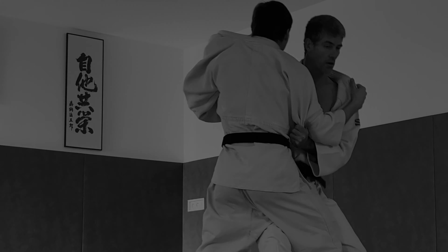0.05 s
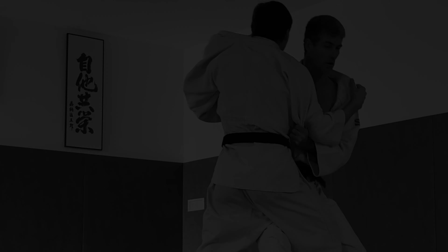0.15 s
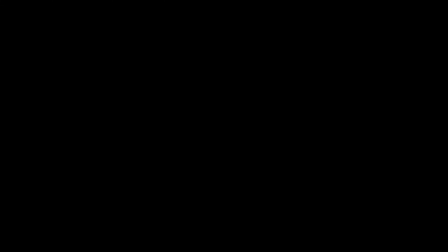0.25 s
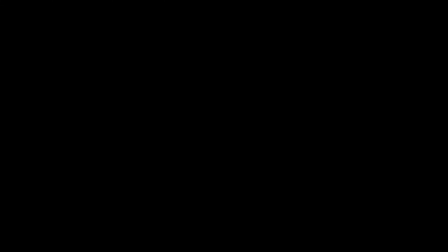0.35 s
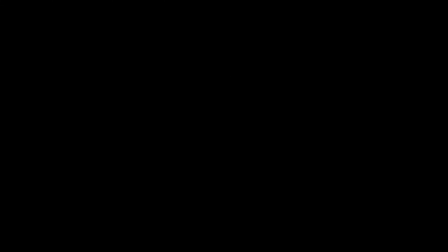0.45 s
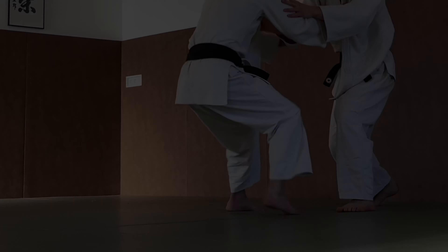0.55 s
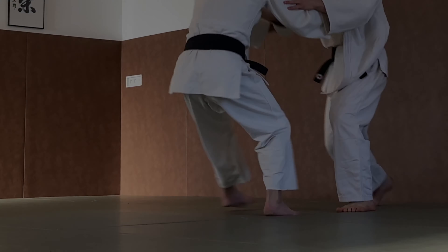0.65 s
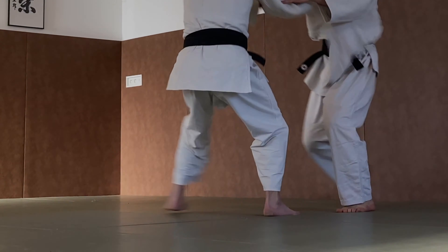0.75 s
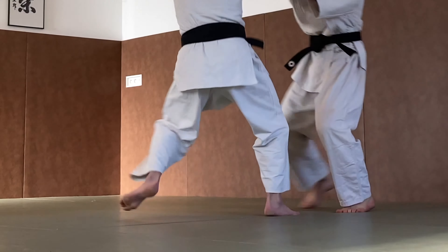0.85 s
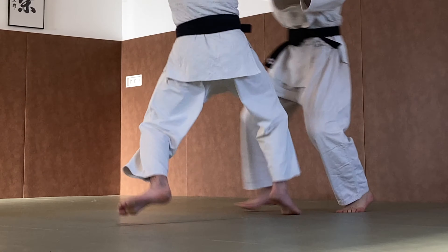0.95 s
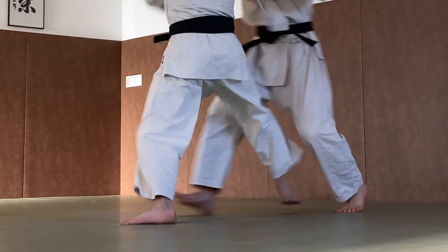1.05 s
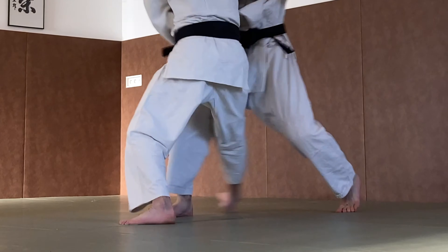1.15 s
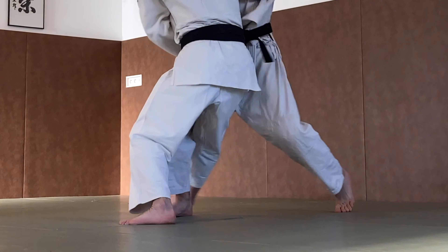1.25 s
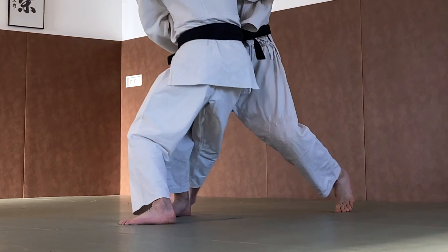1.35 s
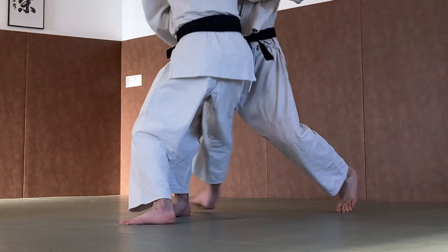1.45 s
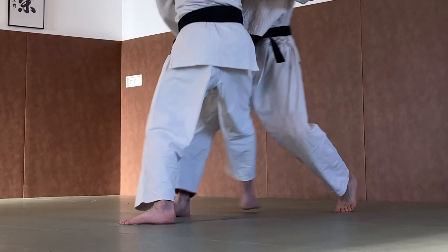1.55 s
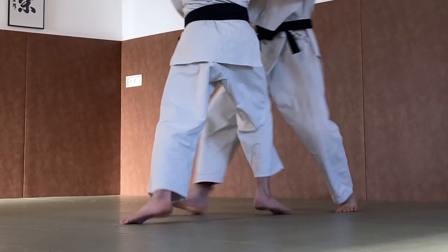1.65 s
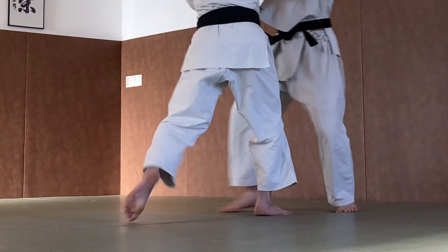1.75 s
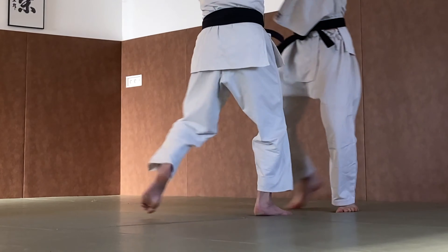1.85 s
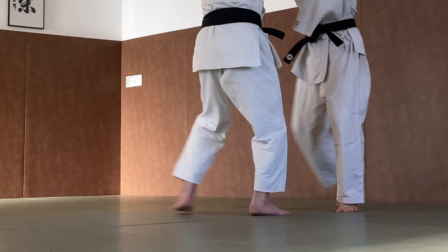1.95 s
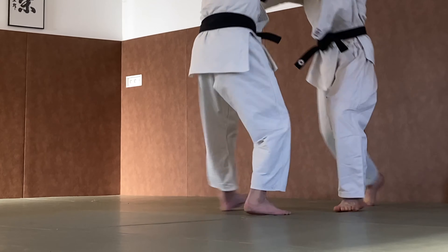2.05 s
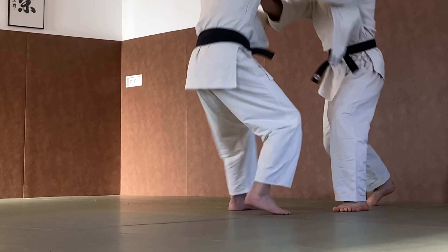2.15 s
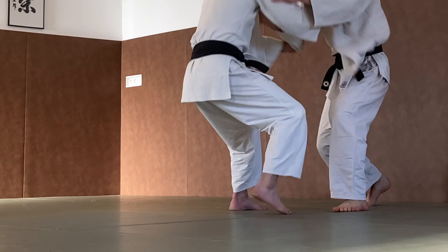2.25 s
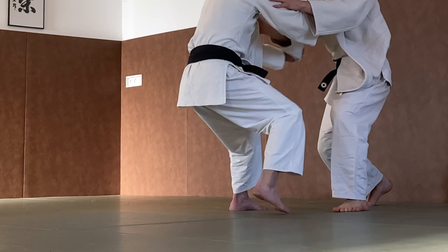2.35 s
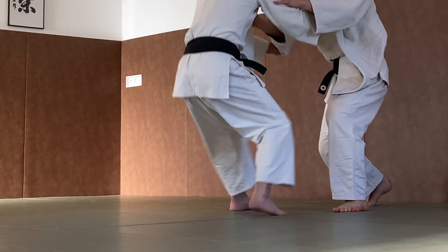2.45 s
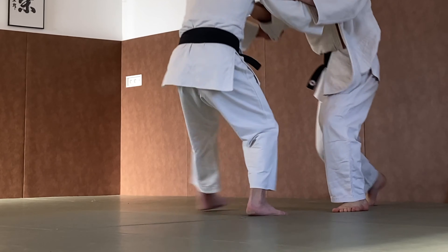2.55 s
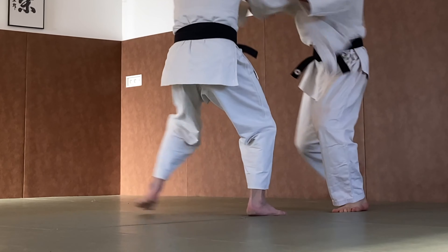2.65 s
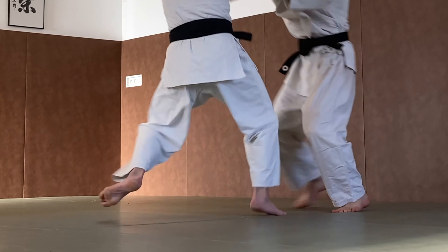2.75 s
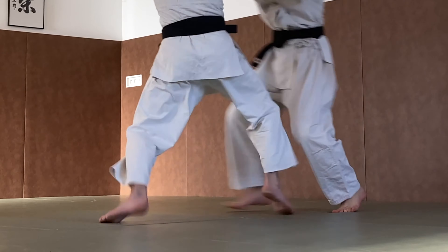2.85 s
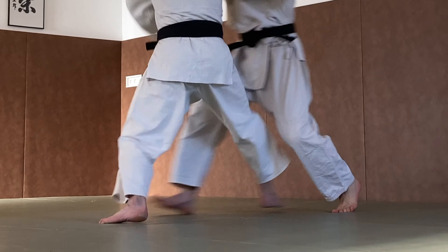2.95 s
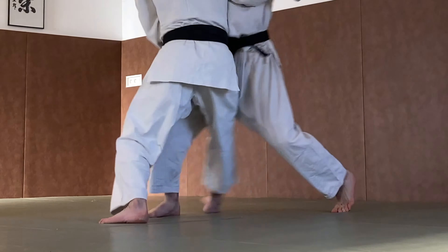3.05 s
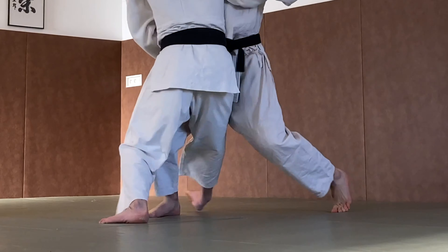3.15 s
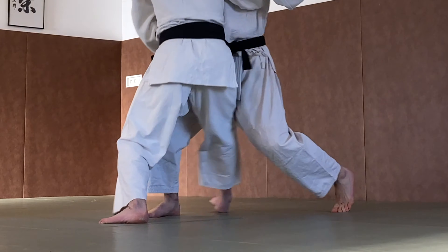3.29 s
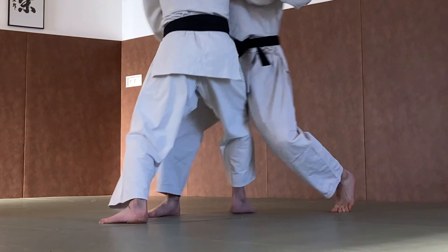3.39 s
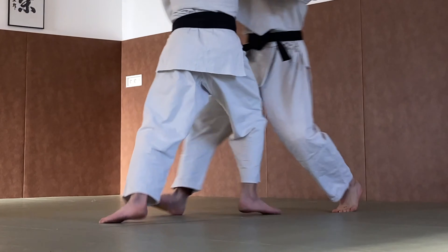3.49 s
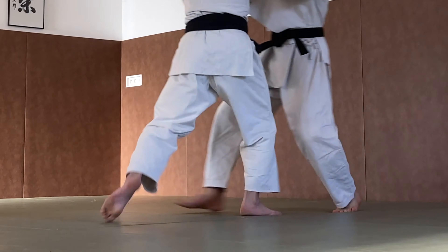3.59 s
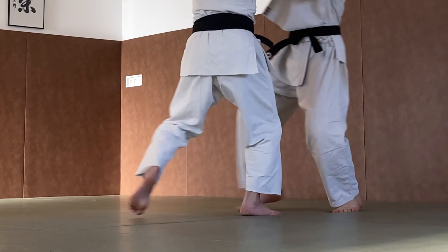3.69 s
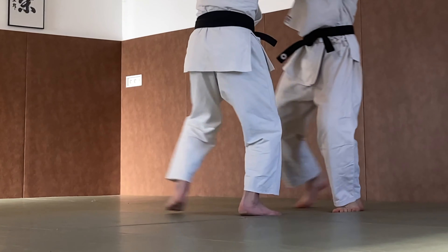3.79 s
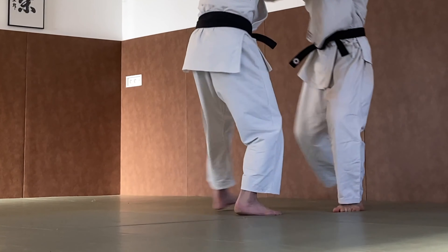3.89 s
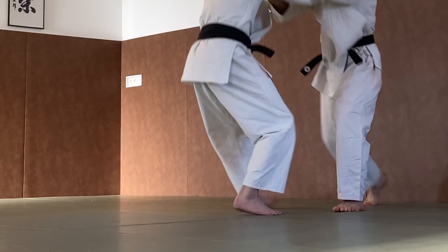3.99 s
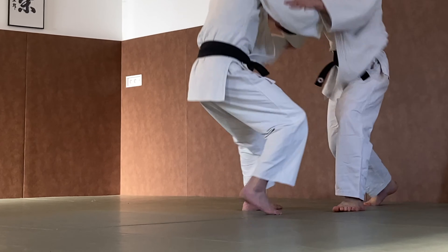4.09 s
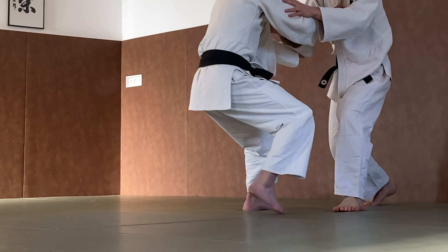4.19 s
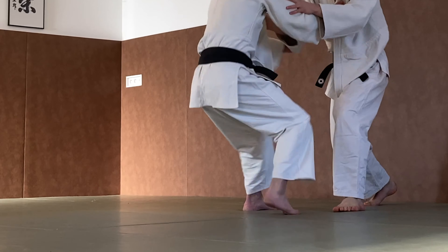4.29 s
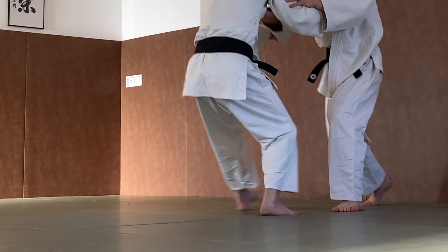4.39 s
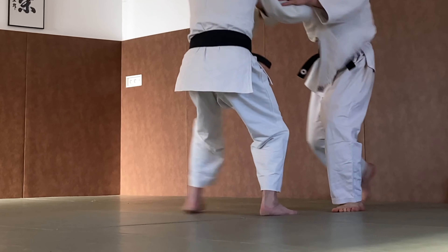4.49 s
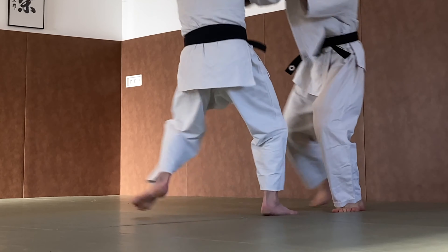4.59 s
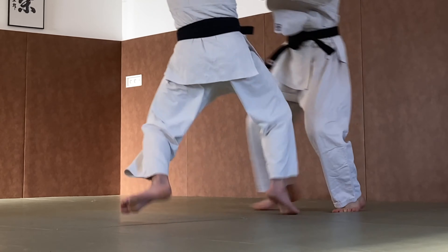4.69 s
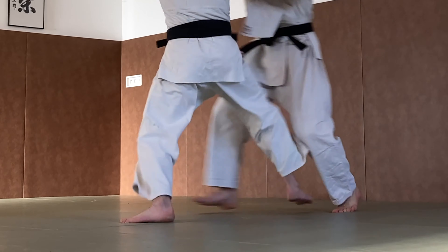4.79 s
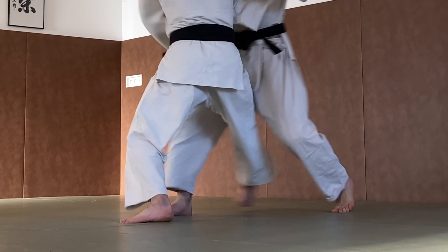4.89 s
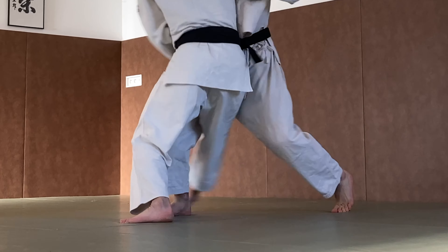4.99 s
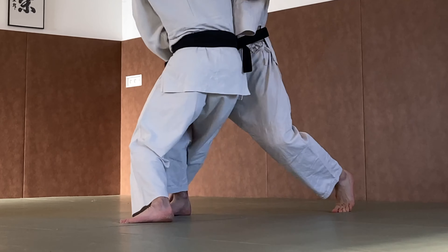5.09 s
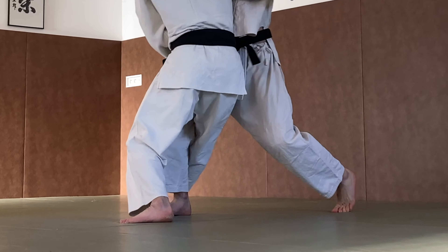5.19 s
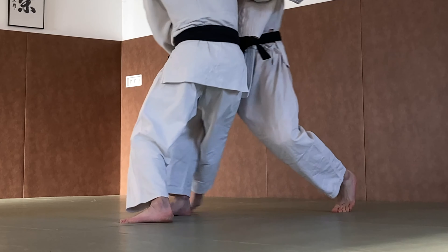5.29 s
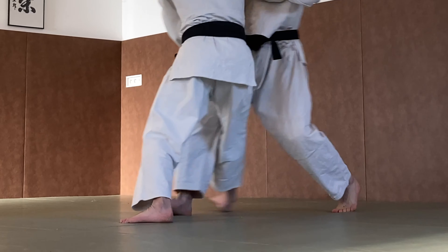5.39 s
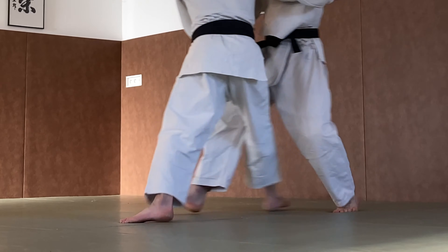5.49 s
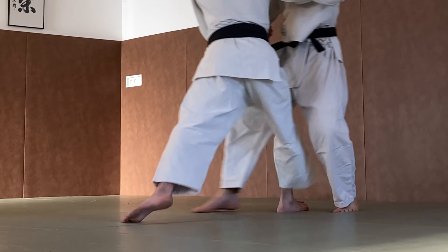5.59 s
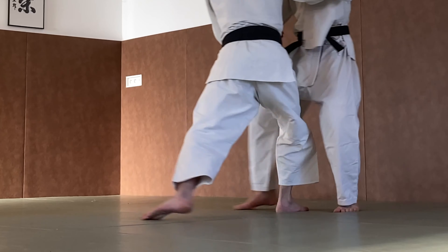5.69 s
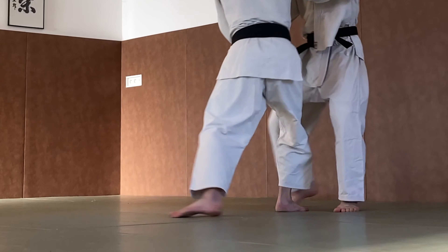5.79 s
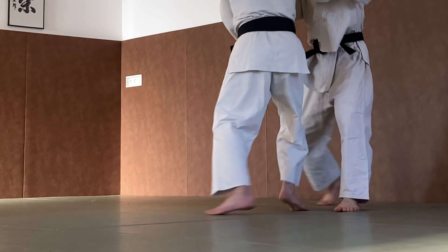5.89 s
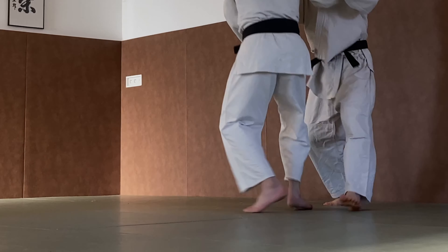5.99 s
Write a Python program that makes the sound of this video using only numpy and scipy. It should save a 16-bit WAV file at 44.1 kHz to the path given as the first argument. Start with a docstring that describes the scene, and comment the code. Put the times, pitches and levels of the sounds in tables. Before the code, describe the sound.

After a short fade-in, bare feet pad and slide across a mat until a flat sole lands with a sharp crack and a low boom. The pattern comes three times: light steps, dull heel knocks, a hard stamp, more shuffling. Thick cotton jackets rub and snap as two people pull at each other. The microphone picks up the ring of a small training hall and its quiet, low room tone.

```python
"""Judo drill in a live hall

Two judoka drill a throw entry barefoot on a padded floor. Three hard stamps crack and slap
the mat and set the floor and the small hall's low modes booming. Between them come soft steps,
hollow heel knocks, soles hissing over the mat and heavy cotton jackets that rustle and snap,
all over the building's low murmur."""
import sys
import numpy as np
from scipy import signal
from scipy.fft import rfft, irfft
from scipy.io import wavfile
from scipy.ndimage import uniform_filter1d

SR = 44100
rng = np.random.default_rng(int(sys.argv[2]) if len(sys.argv) > 2 else 0)


def to_wav(sig):
    """Store sig (one row per channel, or 1-D mono) as 16-bit WAV at the path in sys.argv[1].

    Samples outside -1..1 are clipped; the rate is SR.
    """
    pcm = np.clip(np.atleast_2d(sig), -1, 1) * 32767
    pcm = np.round(pcm).astype(np.int16)
    wavfile.write(sys.argv[1], SR, pcm.T)  # frames by channels


N = 266220
TIME = np.arange(N) / SR

# Cue sheets; levels are relative, ahead of each layer's gain and EQ.
# Jacket tugs: t/s at full pull, level/dB
TUGS = [(.34, -76), (.94, -54.5), (1.78, -55), (2.17, -51.5), (2.93, -46.5), (3.42, -47), (3.66, -52),
        (4.522, -54), (4.84, -46.5), (5.33, -49.5), (5.709, -49.5), (6.0, -52)]
# Strokes of a sole or hem over the mat: t/s, rise/s, time until the fade/s, level/dB
SLIDES = [(0.185, 0.074, 0.055, -55), (0.572, 0.052, 0.27, -69.5), (0.827, 0.07, 0.13, -56),
          (1.049, 0.076, 0.27, -51.5), (1.634, 0.097, 0.19, -51.5), (1.84, 0.041, 0.16, -57),
          (2.033, 0.043, 0.088, -51.5), (2.47, 0.086, 0.34, -70), (2.72, 0.11, 0.42, -58),
          (3.186, 0.33, 0.28, -50), (3.654, 0.028, 0.22, -54), (4, 0.018, 0.044, -59),
          (4.3, .02, 0.03, -62), (4.401, .085, 0.1, -52), (4.624, 0.08, 0.14, -54),
          (5.114, 0.27, 0.32, -47), (5.412, 0.058, 0.16, -57), (5.609, 0.049, 0.48, -50)]
# Snaps of cloth and ticks of skin leaving the mat: t/s, level/dB, tilt/(dB per octave)
SNAPS = [(1.0175, -15, -0.5), (1.055, -16.5, 0), (1.6888, -26, -4), (2.875, -22, -1), (2.9245, -20.5, 0.5),
         (4.7552, -23, -7), (4.7978, -16, 9), (5.6246, -23, -2)]
# Soft steps: t/s, thump/dB, thump cutoff/Hz, skin pat/dB
STEPS = [(.236, -46, 200, -22.5), (0.452, -70, 244, -48), (.609, -39.5, 225, -48), (.798, -28, 208, -21),
         (1.018, -30, 244, -18.5), (1.716, -29.5, 217, -19), (1.932, -45, 171, -29.5),
         (2.104, -39.5, 169, -20), (2.265, -37.5, 177, -22.5), (2.32, -37.5, 115, -45),
         (2.672, -32.5, 212, -19.5), (2.876, -27, 325, -25.5), (2.94, -32, 200, -30),
         (3.531, -40, 298.5, -24.5), (3.62, -50, 300, -31), (3.819, -53, 400, -41), (3.921, -72, 400, -36),
         (4.027, -40.5, 260, -18), (4.401, -38, 295, -27), (4.548, -36.5, 200, -26.5),
         (4.756, -28.5, 248, -22), (4.866, -31, 200, -21.5), (5.575, -36, 228, -24.5),
         (5.622, -30, 177, -30), (5.968, -33.5, 265, -28)]
# Heel landings: t/s, press-in/s, knock/dB, skin smack/dB, floor push/dB
HEELS = [(.792, 0.0081, -4.5, -10, -48), (1.718, 0.041, -8, -8, -54), (2.252, 0.015, -3.5, -9, -54),
         (2.665, 0.0069, 0, -5, -52), (3.551, .008, -18, -21, -63), (4.021, 0.0098, -10.5, -7.5, -67),
         (4.549, 0.0025, -10.5, -14.5, -50), (5.619, 0.0072, -14, -9.5, -49)]
# Stamps: t/s, boom/dB, slap/dB, crack/dB, air clap/dB, clap f/Hz, boom lift at 300 Hz/dB, knock/dB
STAMPS = [(1.136, -6.5, -3.5, -4, 0, 2010, -9, 4), (3.0207, -9.5, -6, -7.5, -6, 1650, 2, -3),
          (4.9022, -10.5, -7.5, -15, -16.5, 2900, -0.5, 5.5)]

# Reverb time of the hall: f/Hz, t60/s
HALL_DECAY = [(60, 0.88), (250, 0.88), (480, 0.47), (720, 0.59), (1100, 0.79), (2200, 0.83), (4500, 1),
              (8000, 0.63), (12000, 0.56), (16000, 0.39)]
# Likeness of left and right in the hall: f/Hz, correlation (-1 to 1)
STEREO_LIKENESS = [(60, 0.83), (150, 0.99), (290, 0.64), (640, 0.056), (1400, 0.078), (16000, 0.022)]
# Low modes of floor and room, rising: f/Hz, level/dB, t60/s
LOW_MODES = [(71.7, -16.5, .75), (75, -14, .68), (78.3, -5.7, .41), (89, -1.8, .76), (103.7, -7.5, .41),
             (107.4, -18.2, .99), (124, -8.7, .4), (135.4, 1.2, .51), (135.7, 3.9, .39), (158.4, -23, 1.4),
             (169.4, 8.6, .37), (169.7, 11.4, .29), (202.2, -21.3, .42), (206.4, -14.9, .64),
             (214.4, -7.5, .33), (228.4, -15, .5), (250.8, -10.9, .44), (256.1, -19.9, .55),
             (285.5, -12.1, .25), (290.7, -17, .52), (320, -30, .46), (329.6, -14, .11),
             (337.2, -21.5, .32), (351.8, -25, .53)]
# Upper resonances of mat and room: f/Hz, width/Hz, level/dB
UPPER_RINGS = [(452, 21, 10), (673, 61, 5), (1440, 120, -1), (2000, 43, -7), (2218, 100, 5),
               (2450, 32, 1.5), (3070, 70, 0), (3610, 38, 5)]
# A stamp's thump thrown back by the walls: delay/s, level/dB, f/Hz
REBOUNDS = [(.0519, -11, 302), (.0821, -1, 142), (.134, -18, 274), (.2609, -13.5, 100)]
# The air pop, direct and off the nearest walls: delay/s, level/dB, left channel lag/s
POP_PATHS = [(0, 0, 0), (.0031, -6, .0002), (.0068, -3, -.0001), (.0105, -8, -.0003), (.015, -5, .0003)]

# EQ curves, one per sound: f/Hz, level/dB
MURMUR_EQ = [(20, -41), (40, -10), (80, 0), (160, -9.5), (300, -11.5), (600, -24.5), (2000, -31),
             (8000, -51), (16000, -53)]  # the building's rumble
RUSTLE_EQ = [(30, -16), (150, 10), (300, 6), (550, -3.5), (900, 2), (1400, 1), (2500, 0), (4500, -6.5),
             (8000, -6), (16000, -84)]  # thick cotton rubbing
SLIDE_EQ = [(100, -29), (1500, -10.5), (3500, -0.5), (5500, -3.5), (7800, -2.5), (11000, 3.5),
            (15000, -6.5), (16500, -2)]  # a sole brushing the mat
SNAP_EQ = [(100, -39), (1000, -1.5), (4000, -3), (8000, -6.5), (12000, -1), (16000, -11)]  # cloth pulling taut
PAT_EQ = [(30, -2), (150, 21), (400, 12.5), (750, 8.5), (1300, 6), (2500, -2), (5000, -6.5), (10000, -20),
          (16000, -16)]  # skin landing lightly
KNOCK_EQ = [(30, -17), (100, -14), (270, 6.5), (460, 9), (680, 3), (950, -1), (1400, -15), (4200, -40),
            (16000, -49)]  # the hollow body of a heel strike
SMACK_EQ = [(100, -23), (500, -12), (900, 6), (1800, 2), (4300, -2), (5500, -13), (8000, -7), (16000, -35)]  # the skin of the heel
SLAP_EQ = [(25, -40), (39, 9), (48, 5), (62, 0), (150, 5.5), (330, 7.5), (480, -2), (620, -2), (1000, -3),
           (2200, -5.5), (3500, -6), (5500, -8.5), (7800, -6.5), (12000, -11.5), (16000, -26)]  # a flat sole landing hard
CRACK_EQ = [(100, -4), (700, -6), (1700, -1), (3200, -1), (5000, -11), (8000, -20), (11000, 3.5),
            (16000, -17)]  # a stamp's first touch


def amp(db):
    """Decibels to gain."""
    return 10 ** (np.asarray(db) / 20)


def unit(x):
    """Scales to rms 1."""
    return x / np.sqrt(np.mean(x ** 2) + 1e-20)


def curve_at(points, hz):
    """Reads a curve on a log-frequency axis."""
    f, value = np.transpose(points)
    return np.interp(np.log(hz + 1), np.log(f + 1), value)


def add(mix, s, sound):
    """Mixes a stereo sound in at time s."""
    part = mix[:, max(round(s * SR), 0):][:, :sound.shape[1]]
    part += sound[:, :part.shape[1]]


def eq(x, points, size=4096):
    """Minimum-phase EQ, so nothing rings ahead of an attack."""
    log_gain = np.log(amp(curve_at(points, abs(np.fft.fftfreq(size, 1 / SR)))))
    spectrum = np.exp(np.conj(signal.hilbert(log_gain)))
    taps = np.fft.ifft(spectrum).real[:size // 2]
    return signal.oaconvolve(x, taps[None], axes=1)[:, :x.shape[1]]


def stereo_field(x):
    """Blends two unrelated channels: narrow in the bass, wide in the treble."""
    likeness = curve_at(STEREO_LIKENESS, np.fft.rfftfreq(x.shape[1], 1 / SR))
    angle = np.arccos(np.clip(likeness, -1, 1)) / 2
    mid, side = rfft(x)
    return irfft(mid * np.cos(angle) + np.array([[1], [-1]]) * side * np.sin(angle), x.shape[1])


def murmur(db=-55):
    """Room tone: the steady low murmur of the building."""
    noise = stereo_field(rng.standard_normal((2, N)))
    return amp(db) * unit(eq(noise, MURMUR_EQ))


def hall(build_s=0.05, early_db=-3.5):
    """The hall's reverb: reflections thicken, then die band by band."""
    t = np.arange(SR) / SR
    density = np.minimum(0.045 + (t / build_s / 2) ** 2, 1)
    taps = rng.choice([-1, 1], (2, SR)) * (rng.random((2, SR)) < density) / np.sqrt(density)
    hz, age, bands = signal.stft(stereo_field(taps), SR, nperseg=256)
    decay = amp(-60 * age / curve_at(HALL_DECAY, hz)[:, None])
    tail = signal.istft(bands * decay, SR, nperseg=256)[1][:, :SR]
    tail *= amp(early_db * np.exp(-(t / build_s) ** 2))
    return tail / np.sqrt(np.sum(tail ** 2) / 2)


def resonance(x, hz, width_hz):
    """One resonant band with a peak gain of 1."""
    return signal.lfilter(*signal.iirpeak(hz, hz / width_hz, SR), x)


def ringed(x, ring_db):
    """Adds the upper resonances of mat and room to a sound."""
    return x + sum(amp(db + ring_db) * resonance(x, hz, width) for hz, width, db in UPPER_RINGS)


def spot(hz):
    """How a random spot in the room favours some frequencies over others, -1 to 1."""
    return np.cos(2 * np.pi * (hz / 90 + rng.random()))


def low_modes(spread=0.13, pan_db=1.12, delay_s=0.004, lag_s=0.00014):
    """Floor and room ring as decaying sines; shape (channel, mode, sample)."""
    hz, db, t60 = np.transpose(LOW_MODES)[:, :, None]
    side = np.array([-1, 1])[:, None, None]
    t = np.maximum(np.arange(SR) / SR - delay_s + side * lag_s, 0)
    imbalance = spread * (hz / 200) ** 3 * spot(hz)  # shorter waves differ more from left to right
    polarity = (-1) ** np.arange(len(hz))[:, None]  # neighbouring modes swing in opposite senses
    envelope = amp(db + side * pan_db - 60 * t / t60)
    return polarity * (1 + side * imbalance) * envelope * np.sin(2 * np.pi * hz * t)


def contact(decay_s, channels=2):
    """Skin or cloth touches patch by patch: a dying noise burst of energy 1."""
    t = np.arange(SR // 25) / SR
    burst = rng.standard_normal((channels, len(t))) * np.exp(-t / decay_s)
    return burst / np.linalg.norm(burst, axis=1, keepdims=True)


def ripple(depth):
    """An impulse with a short scatter behind it, which ripples a sound's spectrum."""
    taps = depth * contact(0.004, channels=1)
    taps[0, 0] += 1
    return taps


def friction(points, slips_per_s, size_db, clump_db, wet, ring_db, folds_db=2.2):
    """Tiny slips in clumps over a wash of reflections, tinted by shifting folds and near walls."""
    drift = unit(uniform_filter1d(rng.standard_normal(N), 900))
    clumps = amp(clump_db * np.minimum(drift, 1.6))
    sizes = amp(size_db * np.minimum(rng.exponential(1, (2, N)), 4))
    slips = (rng.random((2, N)) < slips_per_s / SR) * rng.standard_normal((2, N)) * sizes
    rub = stereo_field(unit(slips * clumps) + wet * rng.standard_normal((2, N)))
    bands = signal.stft(rub, nperseg=1024)[2]
    folds = uniform_filter1d(rng.standard_normal(bands.shape[1:]), size=6, axis=0)  # across frequency
    folds = unit(uniform_filter1d(folds, size=7, axis=1))  # across time
    rub = signal.istft(bands * amp(folds_db * folds), nperseg=1024)[1][:, :N]
    near_walls = signal.oaconvolve(eq(rub, points), ripple(depth=0.3), axes=1)[:, :N]
    return unit(ringed(near_walls, ring_db))


def stroke(start_s, rise_s, length_s, fade_db_per_s):
    """Envelope of one rub: it gathers speed, then dies away from length_s after its start."""
    t = TIME - start_s
    swell = np.sin(np.pi / 2 * np.clip(t / rise_s, 0, 1)) ** 2
    return swell * amp(-fade_db_per_s * np.maximum(t - length_s, 0))


def jackets(gain_db=-2, rest_db=-54, rise_s=0.15, fade_db_per_s=55):
    """Thick cotton rubs low and coarse; each tug swells, holds and fades over a constant rustle."""
    rustle = friction(RUSTLE_EQ, slips_per_s=1800, size_db=-1.5, clump_db=3.5, wet=1.3, ring_db=-14)
    power = sum((amp(db) * stroke(s - rise_s, rise_s, 2 * rise_s, fade_db_per_s)) ** 2
                for s, db in TUGS)
    return amp(gain_db) * rustle * np.sqrt(amp(rest_db) ** 2 + power)


def slides(gain_db=5, rest_db=-74, fade_db_per_s=94):
    """Soles hiss over the mat in strokes; the feet are never quite still."""
    hiss = friction(SLIDE_EQ, slips_per_s=6900, size_db=3, clump_db=3, wet=1.33, ring_db=-23)
    power = sum((amp(db) * stroke(s, rise_s, length_s, fade_db_per_s)) ** 2
                for s, rise_s, length_s, db in SLIDES)
    return amp(gain_db) * hiss * np.sqrt(amp(rest_db) ** 2 + power)


def snaps(gain_db=4, room_db=-6, click_db=-7, fray_db=-2, pivot_hz=7000):
    """Cloth pulls taut or skin leaves the mat: a clean click and a short fray, with the hall behind."""
    out = np.zeros((2, N))
    for s, db, tilt in SNAPS:
        snap = amp(room_db) * hall()
        add(snap, 0, amp(fray_db) * contact(0.0009))
        snap[:, 0] += amp(click_db)
        tilted_eq = [(hz, level_db + tilt * np.log2(hz / pivot_hz)) for hz, level_db in SNAP_EQ]
        add(out, s, amp(db + gain_db) * eq(snap, tilted_eq))
    return out


def press_in(sound, rise_s):
    """Soft flesh takes time to press in, which rounds off the attack."""
    t = np.arange(sound.shape[1]) / SR
    return sound * np.sin(np.pi / 2 * np.clip(t / rise_s, 0, 1)) ** 2


def sole(direct):
    """A sole lands in the hall; its uneven contact colours the hit and all its reflections."""
    uneven = ripple(depth=0.33)
    sound = hall()
    add(sound, 0, direct * contact(0.0011))
    return signal.oaconvolve(sound, uneven / np.linalg.norm(uneven), axes=1)


def steps(pat_gain_db=12, low_cut_hz=100, settle_s=0.062, settle_cutoff_hz=133, roll_cycles=4.34):
    """Light steps: a pat of skin and a muffled thump, then a second thump as the weight settles."""
    out = np.zeros((2, N))
    mode_hz, modes = np.transpose(LOW_MODES)[0], low_modes()
    for s, thump_db, touch_cutoff_hz, pat_db in STEPS:
        for delay_s, cutoff_hz in ((0, touch_cutoff_hz), (settle_s, settle_cutoff_hz)):
            weights = amp(2 * spot(mode_hz)) / np.sqrt(1 + (mode_hz / cutoff_hz) ** 4)
            weights *= mode_hz / np.hypot(mode_hz, low_cut_hz)  # little weight, so less deep bass
            thump = press_in(weights @ modes, roll_cycles / cutoff_hz)  # softer contact builds slower
            add(out, s + delay_s, amp(thump_db) * thump)
        pat = press_in(eq(sole(direct=0.19), PAT_EQ), rise_s=0.011)
        add(out, s, amp(pat_db + pat_gain_db) * pat)
    return out


def knock():
    """A firm heel meets the mat with a short, hollow knock that carries into the hall."""
    sound = hall()
    add(sound, 0, contact(0.02))
    return ringed(eq(sound, KNOCK_EQ), ring_db=-8)


def heels(push_hz=44, push_delay_s=0.06, push_width_s=0.061):
    """Heel landings: a knock, a smack of skin and a deep push as the sprung floor sinks."""
    out = np.zeros((2, N))
    t = np.arange(SR) / SR - push_delay_s
    push = np.exp(-(t / push_width_s) ** 2) * np.sin(2 * np.pi * push_hz * t)
    for s, rise_s, knock_db, smack_db, push_db in HEELS:
        skin = np.zeros((2, SR))
        add(skin, 0, contact(0.03))
        landing = amp(knock_db) * knock() + amp(smack_db) * eq(skin, SMACK_EQ) + amp(push_db) * push
        add(out, s, press_in(landing, rise_s))
    return out


def rebounds(width_s=0.009):
    """A few cycles of a stamp's thump come back off the walls, a little to the right."""
    t = np.arange(SR) / SR
    echoes = sum(amp(db) * np.exp(-((t - s) / width_s) ** 2) * np.sin(2 * np.pi * hz * (t - s))
                 for s, db, hz in REBOUNDS)
    return echoes * amp([[-1], [1]])


def air_pop(hz, decay_s=0.00065):
    """Air trapped under the sole escapes in one puff, followed by its first reflections."""
    t = np.arange(SR // 20) / SR
    out = np.zeros((2, len(t)))
    for delay_s, db, lag_s in POP_PATHS:
        age = np.maximum(t - delay_s - np.array([[lag_s], [0]]), 0)
        out += amp(db) * np.exp(-age / decay_s) * np.sin(2 * np.pi * hz * age)
    return out


def stamps(slap_gain_db=19, crack_gain_db=10, pop_gain_db=-7.5, pop_delay_s=0.000996,
           weight_delay_s=0.0016):
    """A flat sole hits: crack, ringing slap and heel knock, a pop of air, then the weight booms."""
    out = np.zeros((2, N))
    mode_hz, modes = np.transpose(LOW_MODES)[0], low_modes()
    for s, boom_db, slap_db, crack_db, clap_db, clap_hz, lift_db, knock_db in STAMPS:
        slap = eq(sole(direct=0.028), SLAP_EQ) * amp([[0.4], [-0.4]])  # a touch to the left
        air_clap = amp(clap_db) * resonance(slap, clap_hz, width_hz=2700)
        add(out, s, amp(slap_db + slap_gain_db) * ringed(slap + air_clap, ring_db=-4))
        add(out, s, amp(crack_db + crack_gain_db) * eq(contact(0.002), CRACK_EQ))
        add(out, s, amp(knock_db) * knock())
        add(out, s + pop_delay_s, amp(clap_db + pop_gain_db) * air_pop(clap_hz))
        boom = amp(lift_db * (mode_hz / 300) ** 3) @ modes
        add(out, s + weight_delay_s, amp(boom_db) * (boom + rebounds()))
    return out


def scene():
    """The full mix: footwork and cloth over the room tone."""
    return stamps() + steps() + snaps() + slides() + jackets() + murmur() + heels()


def record(dry, fade_s=0.42, cutoff_hz=16300):
    """A short fade-in and a steep high cut."""
    faded = dry * np.clip(TIME / fade_s, 0, 1) ** 1.04
    high_cut = signal.firwin(511, cutoff_hz, window=("kaiser", 9), fs=SR)
    return signal.oaconvolve(faded, high_cut[None], "same")


dry = scene()
out = record(dry)
to_wav(out)
```